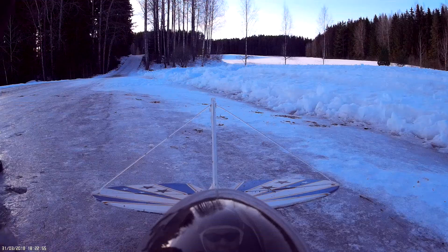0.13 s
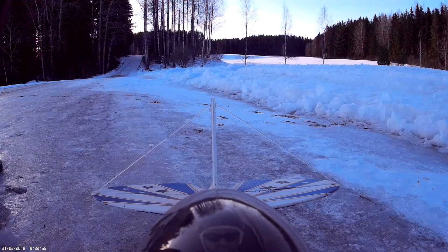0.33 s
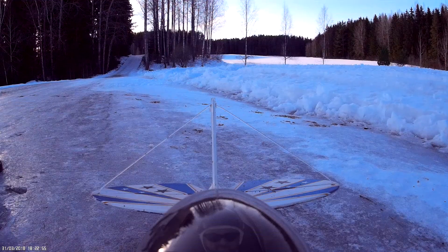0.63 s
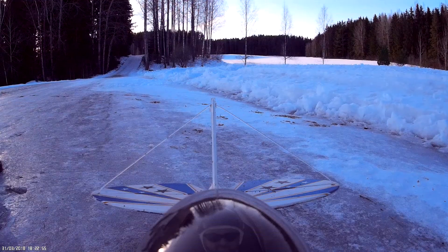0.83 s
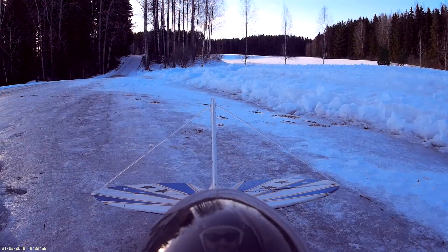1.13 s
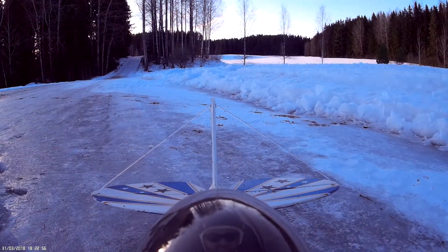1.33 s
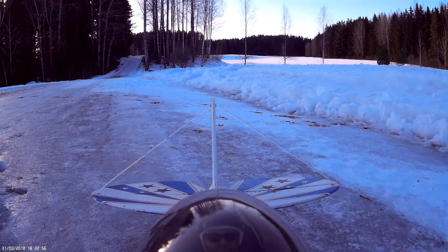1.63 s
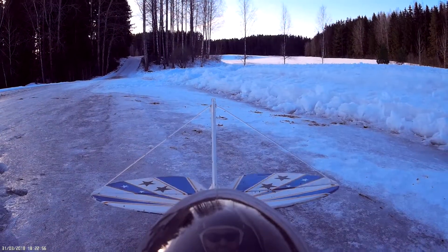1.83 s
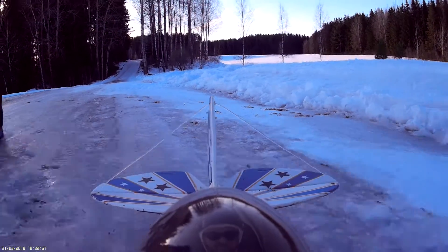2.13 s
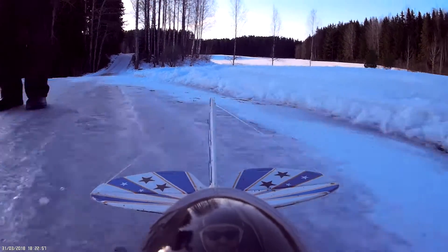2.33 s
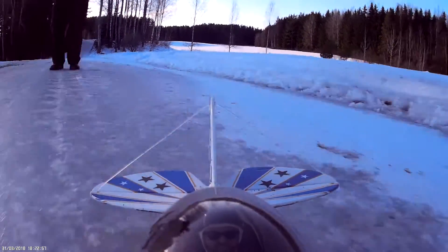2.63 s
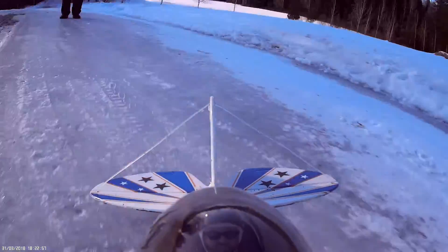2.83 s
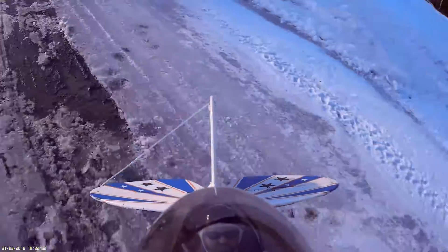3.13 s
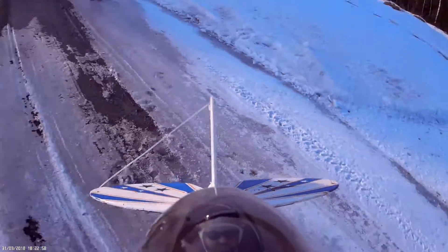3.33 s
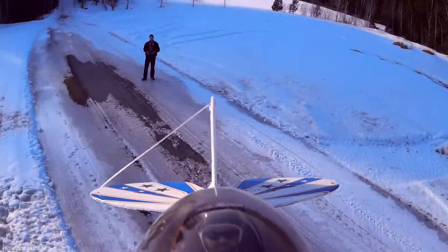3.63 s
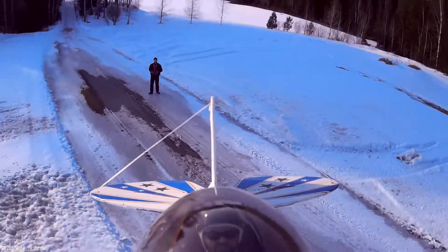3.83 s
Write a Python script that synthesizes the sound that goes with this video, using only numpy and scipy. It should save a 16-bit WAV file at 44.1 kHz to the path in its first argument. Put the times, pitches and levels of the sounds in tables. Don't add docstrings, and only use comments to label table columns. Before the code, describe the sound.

A small electric model plane sits in quiet winter air with faint creaks, then its motor jolts, rattles and whines upward into a loud, distorted propeller roar, heard from a microphone mounted on the plane.

```python
import sys
import numpy as np
from scipy import signal
from scipy.fft import rfft, irfft, next_fast_len
from scipy.io import wavfile
from scipy.ndimage import uniform_filter1d, map_coordinates

SR = 44100
rng = np.random.default_rng(int(sys.argv[2]) if len(sys.argv) > 2 else 0)


def makeup_ratio(level_db):
    decades = np.asarray(level_db, float) / 20
    return 10 ** decades


def waveform_to_disk(signal):
    frames = np.transpose(np.atleast_2d(signal))
    scaled = np.clip(frames, -1, 1) * 32767
    samples = np.round(scaled).astype(np.int16)
    wavfile.write(sys.argv[1], SR, samples)


N = 176400

# time_s, blade_pass_hz
BLADE_RATE = [(1.19, 10), (1.34, 24.3), (1.38, 27.8), (1.42, 29.7), (1.47, 31.8), (1.495, 36),
              (1.625, 35.2), (1.74, 38.9), (1.86, 42), (1.9, 44.7), (1.94, 50), (1.98, 61.5), (2.005, 70.5),
              (2.06, 89), (2.1, 103), (2.15, 118), (2.215, 129.5), (3.25, 130), (4.0, 131.6)]
# time_s, throb_db, second_order_db, higher_orders_db, slipstream_db
THRUST_LEVELS = [(1.2, -70, 1, 1, -40.5), (1.42, -68, -5, -5, -46.5), (1.47, -35, 5.5, 0.5, -35.5),
                 (1.85, -40, -15, -15, -27.5), (1.97, -32, -1, -10, -24.5), (2.02, -14, -9, -16, -15.5),
                 (2.07, -27.5, 22.5, 6, -7), (2.095, 0.5, -11, -0.5, -20.5), (2.205, -1, -2.5, -2.5, -11.5),
                 (2.23, -15, 0.5, 4, -13), (2.26, -5, -1.5, -2, -12.5), (2.45, -7, -1.5, 1.5, -12),
                 (2.65, -6.5, -6, -6.5, -14), (2.85, -11, 2.5, 1.5, -14), (3.1, -6, 1, 3.5, -13),
                 (3.3, -18, 6, 3, -15.5), (3.5, -9, -0.5, -2.5, -13), (3.75, -10.5, 2, 0, -13.5),
                 (4.0, -15, 2, -8.5, -14)]
# order, level_db
BLADE_ORDERS = [(1, 0), (2, -3), (3, -10), (4, -9), (5, -13), (6, -15), (7, -26)]
# freq_hz, density_db_per_hz
SLIPSTREAM_SPECTRUM = [(15, -56), (25, -11), (119, -1.5), (198, -8), (259, -7.5), (313, -10.5), (1660, -24),
                       (7280, -40.5), (15500, -47.5)]
# time_s, level_db
CANOPY_WHISTLE = [(2.1, -64), (2.5, -30.5), (3.2, -49), (3.35, -32), (3.45, -26.5), (3.6, -26),
                  (4.0, -27.5)]
# time_s, level_db
WHINE_LEVEL = [(1.24, -50), (1.31, -29), (1.36, -22), (1.41, -23), (1.45, -33), (1.55, -29), (1.62, -25),
               (1.72, -22), (1.82, -26), (1.88, -20), (1.94, -13), (1.98, -18), (2.012, -21), (2.035, -60)]
# slot_rate_multiple, level_db, lean_db_per_blade_hz
SLOT_ORDERS = [(3, -1, .15), (4, -2.5, -.6), (5, -18, -1.3), (6, 1, -.2), (7, -16, -1.5), (8, -22, -.3),
               (9, -19, 0), (12, -17, .2)]
# freq_hz, gain_db
MOUNT_RESPONSE = [(450, -30), (900, 0), (1340, -2), (1470, -15), (1580, -4), (1950, -3), (3100, -11),
                  (4200, -30)]
# time_s, level_db
RATTLE_LEVEL = [(1.192, -29.5), (1.24, -22.5), (1.3, -19.5), (1.37, -27.5), (1.45, -24.5), (1.62, -28),
                (1.84, -25), (1.94, -20), (2.0, -17.5), (2.07, -17.5), (2.12, -30), (2.3, -25)]
# freq_hz, width_hz, gain_db
BODY_MODES = [(314, 110, -9.5), (500, 74, -1), (880, 145, 3), (1328, 193, 1), (1490, 21, 4),
              (1610, 500, -11.5), (2600, 1900, -22.5), (4453, 54, -13), (7500, 5600, -84)]
# start_s, ring_db, ring_t60_s, crack_db
ROTOR_JOLTS = [(1.193, -22, 0.022, -49), (1.2008, -15.5, 0.028, -42), (1.214, -13.5, 0.022, -54),
               (1.225, -9, 0.024, -55), (1.232, -14, 0.027, -55), (1.24, -8.5, 0.025, -40),
               (1.246, -5.5, 0.013, -43), (1.253, -8, 0.025, -46), (1.261, -13, 0.018, -42),
               (1.283, -10, 0.02, -55), (1.489, 0, 0.028, -28), (2.053, -34, .03, -30),
               (2.068, -33, 0.035, -33)]
# start_s, level_db, pitch_hz
DRIVE_SPARKS = [(1.1435, -58, 9000), (1.2015, -27, 2900), (1.201, -48, 9050), (1.233, -46, 7500),
                (1.241, -34, 7500), (1.2455, -34, 8360), (1.2525, -38, 7500), (1.255, -47, 8500),
                (1.26, -34, 8140), (1.279, -48, 9500), (1.293, -49, 8000), (1.381, -43, 10500),
                (1.4065, -43, 10500), (1.433, -49, 14000), (1.455, -52, 14500), (1.472, -46, 9500),
                (1.485, -22, 2060), (1.489, -24, 3100), (1.49, -32, 11200), (1.542, -50, 14500),
                (1.886, -25, 5750), (1.946, -25, 6000), (1.965, -29, 6400), (2.0505, -30, 9100),
                (2.066, -33, 10000)]
# pitch_hz, on_s, off_s
CONTROLLER_TONES = [(7790, 1.469, 1.99), (4474, 1.205, 2.07), (4420, 1.27, 2.07), (9240, 1.5, 2.0),
                    (15300, 1.3, 1.9), (10000, 1.55, 1.78), (12037, 1.8, 1.96), (15600, 1.195, 1.3),
                    (336, 1.28, 1.72), (349, 1.21, 1.28), (234, 1.21, 1.28), (478, 1.27, 1.33),
                    (65, 1.6, 1.86)]
CONTROLLER_LEVELS = [-53, -61, -51, -68, -67, -76, -61, -66, -39.5, -28, -28.5, -23.5, -32.5]
# freq_hz, density_db_per_hz
WINDING_SPECTRUM = [(2500, -21), (4800, 10), (6200, -12), (7800, -29), (9200, -8), (10800, -33),
                    (12000, -17), (15000, -24)]
# start_s, level_db
SERVO_STEPS = [
    (1.061, -64),
    (1.08, -67),
    (1.095, -53),
    (1.117, -52.5),
    (1.135, -51),
    (1.153, -46),
    (1.167, -62),
    (1.186, -72),
]
# start_s, peak_db, pitch_hz
CREAKS = [(0.074, -37, 685), (0.094, -47, 323), (0.131, -46, 325), (0.142, -47.5, 301), (0.331, -56, 1380),
          (0.342, -52, 1560), (0.511, -54, 474), (0.664, -52, 315), (0.722, -56.5, 627), (0.788, -52, 474),
          (0.847, -49.5, 1290), (0.916, -54, 1390), (0.948, -57, 1450)]
# freq_hz, density_db_per_hz
HUSH_SPECTRUM = [(12, -36), (20, -9), (53, -11), (90, -11), (415, -24), (1260, -27.5), (15500, -35.5)]
# freq_hz, gain_db
PORT_RESPONSE = [(3000, -1.5), (4100, -1.5), (5400, 1.5), (5900, -2), (7000, 2), (10300, -3), (12000, -4.5),
                 (14500, -7.5), (15700, -14)]

SLOTS_PER_BLADE_PASS = 6
FIZZ_HZ = 7160


def unit(x):
    return x / np.sqrt(np.mean(x ** 2) + 1e-20)


def along(points, hz):
    f, v = np.transpose(points)
    return np.interp(np.log(hz + 1), np.log(f + 1), v)


def curves(rows, left=None):
    s, *cols = np.transpose(rows)
    return [np.interp(np.arange(N) / SR, s, c, left=left) for c in cols]


def wobble(rate):
    knots = rng.standard_normal(int(N * 400 / SR))
    return map_coordinates(knots, [np.arange(N) * min(rate, 390) / SR])


def filtered(x, response):
    m = next_fast_len(N + SR // 2)
    return irfft(rfft(x, m) * response(np.fft.rfftfreq(m, 1 / SR)), m)[..., :N]


def turns():
    return 2 * np.pi * np.cumsum(curves(BLADE_RATE)[0]) / SR


def stack(orders, phase, shake_db, drift, rate):
    total = 0
    for k, db in orders:
        level = makeup_ratio(db + shake_db * wobble(rate))
        total = total + level * np.cos(round(k) * phase + drift * wobble(rate))
    return np.sqrt(2) * total


def wake_puffs(phase):
    return makeup_ratio(2.4 * np.sin(phase + 1.1) + .4 * wobble(9) + .9 * wobble(70) + 1.5 * wobble(300))


def slipstream(phase):
    low = lambda f: 1 / (1 + (f / FIZZ_HZ) ** 4)
    spectrum = lambda f: makeup_ratio(along(SLIPSTREAM_SPECTRUM, f))
    roar = filtered(wake_puffs(phase) * rng.standard_normal(N), lambda f: spectrum(f) * np.sqrt(low(f)))
    fizz = filtered(wake_puffs(phase) * rng.standard_normal(N), lambda f: spectrum(f) * np.sqrt(1 - low(f)))
    return unit(roar + fizz)


def canopy_edge():
    def shear(f):
        broad = np.exp(-((f - 2150) / 3000) ** 2)
        flute = np.exp(-((f - 4000) / 290) ** 2)
        return broad + 0.65 * flute
    air = makeup_ratio(2.0 * wobble(35)) * rng.standard_normal(N)
    return makeup_ratio(curves(CANOPY_WHISTLE, left=-120)[0]) * unit(filtered(air, shear))


def propeller():
    throb_db, second_db, higher_db, stream_db = curves(THRUST_LEVELS, left=-120)
    phase = turns()
    orders = [(k, db + [0, second_db, higher_db][min(k, 3) - 1]) for k, db in BLADE_ORDERS]
    throb = makeup_ratio(throb_db) * stack(orders, phase + .04 * wobble(30), shake_db=1.2, drift=.1, rate=9)
    return throb + makeup_ratio(stream_db) * slipstream(phase) + canopy_edge()


def body(f):
    total = 0
    for k, (centre, width, db) in enumerate(BODY_MODES):
        mode = 1j * f * width / (centre * centre - f * f + 1j * f * width)
        total = total + (-1) ** k * makeup_ratio(db) * mode
    return total


def motor():
    whine_db = curves(WHINE_LEVEL, left=-120)[0]
    rattle_db = curves(RATTLE_LEVEL, left=-120)[0]
    over_hz = np.clip(curves(BLADE_RATE)[0] - 38, -6, 8)
    orders = [(k, db + lean * over_hz) for k, db, lean in SLOT_ORDERS]
    slot_phase = SLOTS_PER_BLADE_PASS * turns()
    whine = makeup_ratio(whine_db) * stack(orders, slot_phase, shake_db=2, drift=.18, rate=40)
    spikes = rng.standard_normal(N) * makeup_ratio(2.9 * wobble(120) + 0.26 * wobble(21.1))
    mounted = filtered(whine, lambda f: makeup_ratio(along(MOUNT_RESPONSE, f)))
    return mounted + makeup_ratio(rattle_db) * unit(filtered(spikes, body))


def jolts():
    x, t = np.zeros(N + SR), np.arange(SR // 8) / SR
    tones = np.sin(2 * np.pi * 900 * t) + .5 * np.sin(2 * np.pi * 1250 * t)
    for s, db, t60, crack_db in ROTOR_JOLTS:
        ring = makeup_ratio(db - 60 * t / t60) * (1 - np.exp(-t / 0.00043)) * tones
        crack_shape = (1 - np.exp(-t / .0007)) * makeup_ratio(-60 * t / .014)
        crack = crack_shape * uniform_filter1d(rng.standard_normal(len(t)), size=3)
        x[round(s * SR):][:len(t)] += ring + makeup_ratio(crack_db) * crack
    shudder_s, shudder_wide_s, shudder_hz, shudder_db = 1.487, .006, 1175, -5
    u = np.arange(N) / SR - shudder_s
    shudder = np.exp(-.5 * (u / shudder_wide_s) ** 2) * np.sin(2 * np.pi * shudder_hz * u)
    return x[:N] + makeup_ratio(shudder_db) * shudder


def sparks():
    x, t = np.zeros(N + SR), np.arange(SR // 40) / SR
    t60_s = 0.011
    for s, db, hz in DRIVE_SPARKS:
        noise = unit(uniform_filter1d(rng.standard_normal(len(t)), size=6))
        band = noise * np.sin(2 * np.pi * hz * t)
        x[round(s * SR):][:len(t)] += makeup_ratio(db - 60 * t / t60_s) * (1 - np.exp(-t / .0003)) * band
    return x[:N]


def switching():
    t = np.arange(N) / SR
    load_db = 0.49 * np.clip(curves(BLADE_RATE)[0] - 40, 0, 40)
    total = np.zeros(N)
    for db, (hz, on_s, off_s) in zip(CONTROLLER_LEVELS, CONTROLLER_TONES):
        gate = np.clip(np.minimum(t - on_s, off_s - t) / .006, 0, 1)
        level = makeup_ratio(db + load_db * (hz < FIZZ_HZ) + 0.94 * wobble(45))
        total += level * gate * np.sin(2 * np.pi * hz * t + 0.14 * wobble(30))
    return total


def windings():
    t = np.arange(N) / SR
    over_hz = np.clip(curves(BLADE_RATE)[0] - 38, -12, 30)
    grains = rng.standard_normal(N) * makeup_ratio(4.5 * wobble(200) + 2 * wobble(40))
    _, on_s, off_s = CONTROLLER_TONES[1]
    on = (t > on_s) & (t < off_s)
    hiss = unit(filtered(grains, lambda f: makeup_ratio(along([(1500, -60)] + WINDING_SPECTRUM, f))))
    return on * makeup_ratio(-49.5 + 0.6253 * over_hz) * hiss


def servo():
    t = np.arange(N) / SR
    t60_s, ring_hz = .12, 3200
    steps = np.zeros(N)
    for s, db in SERVO_STEPS:
        steps += makeup_ratio(db - 60 * np.abs(t - s) / t60_s) * np.clip((t - s) / 0.00098, 0, 1)
    steps *= t < ROTOR_JOLTS[0][0]
    gear = lambda f: f / (1 + (f / 1500) ** 2.84) + 250 * np.exp(-((f - ring_hz) / 300) ** 2)
    return steps * unit(filtered(rng.standard_normal(N), gear))


def ticks():
    x, t = np.zeros(N + SR), np.arange(SR // 20) / SR
    for s, db, hz in CREAKS:
        knock = 2.5 * uniform_filter1d(rng.standard_normal(len(t)), size=14)
        ring = np.sin(2 * np.pi * hz * t) + knock
        x[round(s * SR):][:len(t)] += makeup_ratio(db - 60 * t / 0.015) * (1 - np.exp(-t / 0.00075)) * ring
    return x[:N]


def hush():
    air = filtered(rng.standard_normal(N), lambda f: makeup_ratio(along(HUSH_SPECTRUM, f)))
    return makeup_ratio(-68.5 + 1.5 * wobble(6.3)) * unit(air)


def scene():
    drive = motor() + jolts() + sparks() + switching() + windings()
    return (drive + propeller() + servo() + ticks())[None]


def soft_clip(v):
    ceiling, knee = .72, 8
    return v / (1 + np.abs(v / ceiling) ** knee) ** (1 / knee)


def roll_off(x):
    return signal.sosfilt(signal.butter(12, 15610, fs=SR, output="sos"), x)


def record(dry):
    def port(f):
        coupling = 1j * f / (3 + 1j * f)
        return makeup_ratio(along([(1500, 0)] + PORT_RESPONSE, f)) * coupling
    x = filtered(soft_clip(dry), port)
    opened = np.arange(N) / SR > .071
    mix = soft_clip(1.06 * x + hush()) * opened
    return roll_off(mix)


dry = scene()
out = record(dry)
waveform_to_disk(out)
```